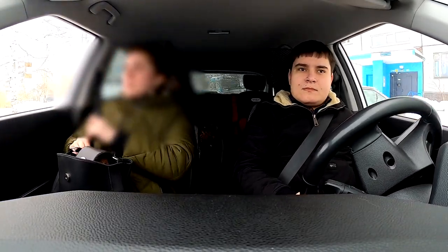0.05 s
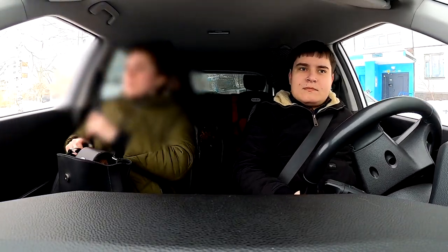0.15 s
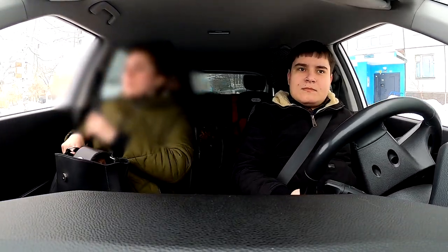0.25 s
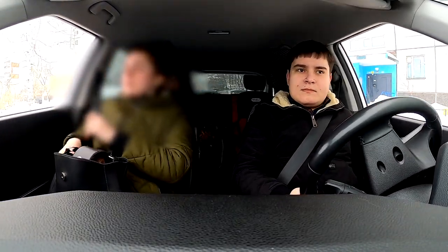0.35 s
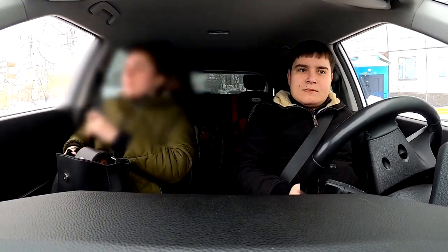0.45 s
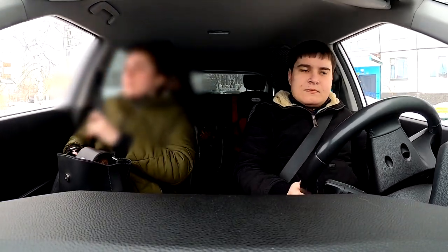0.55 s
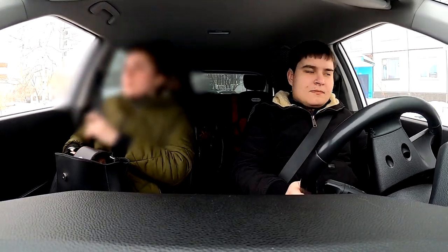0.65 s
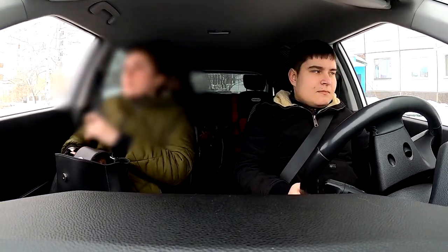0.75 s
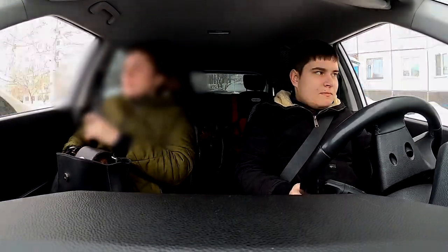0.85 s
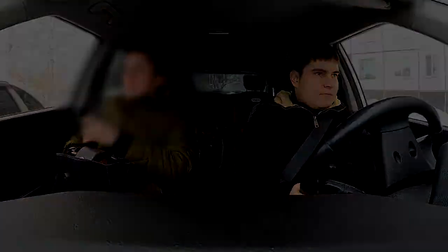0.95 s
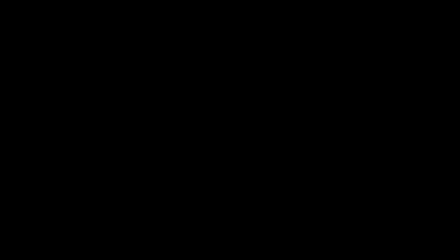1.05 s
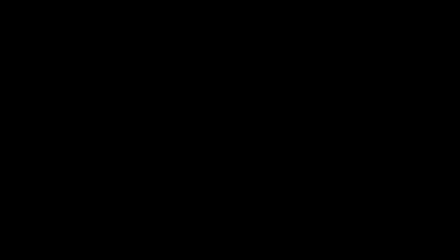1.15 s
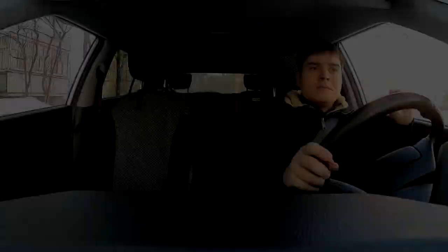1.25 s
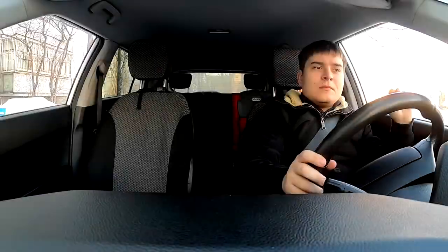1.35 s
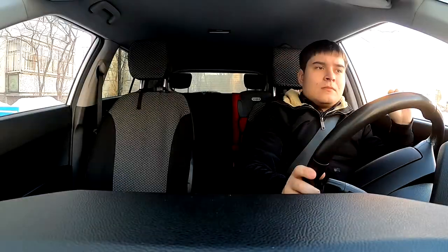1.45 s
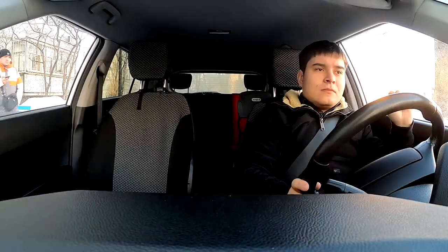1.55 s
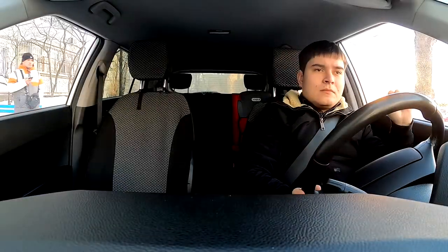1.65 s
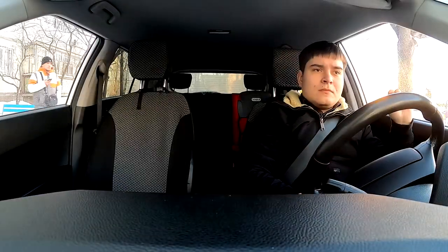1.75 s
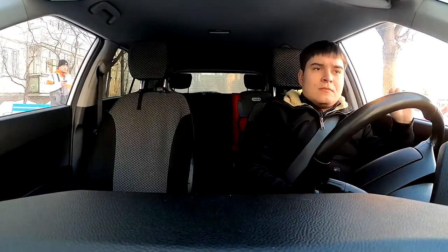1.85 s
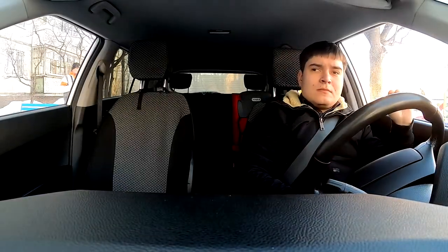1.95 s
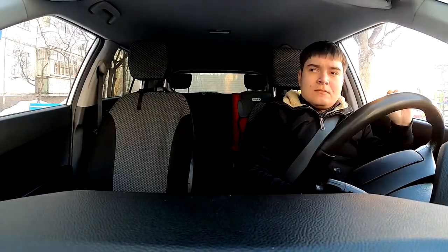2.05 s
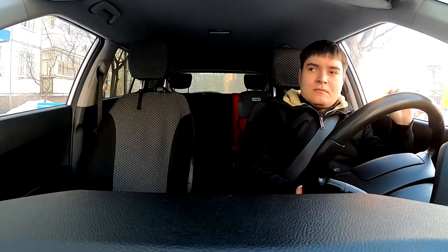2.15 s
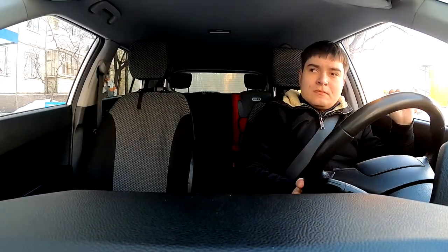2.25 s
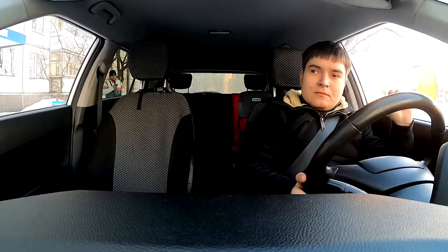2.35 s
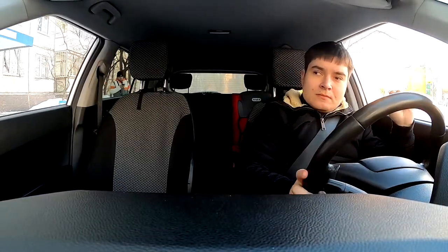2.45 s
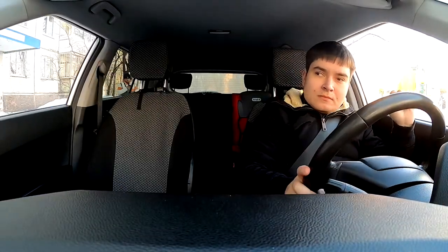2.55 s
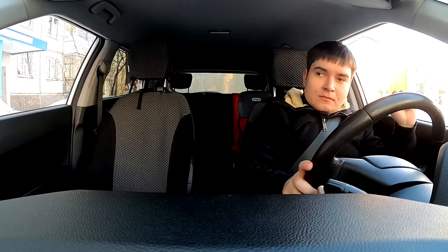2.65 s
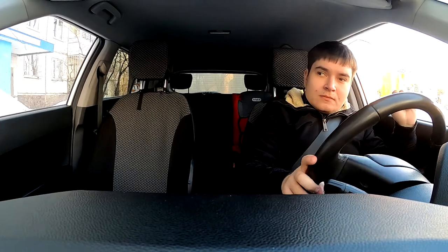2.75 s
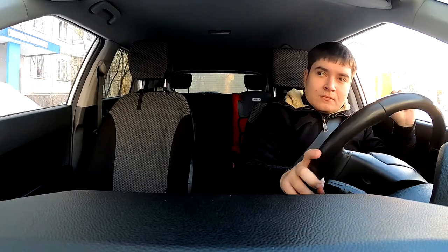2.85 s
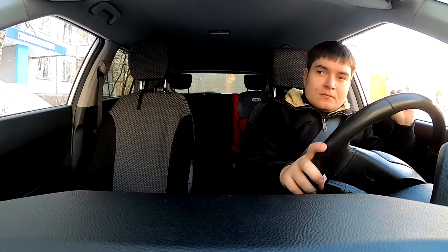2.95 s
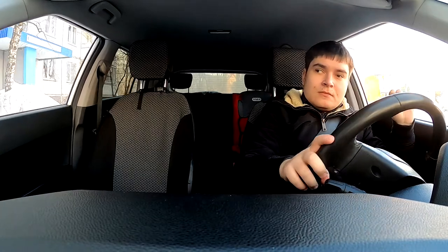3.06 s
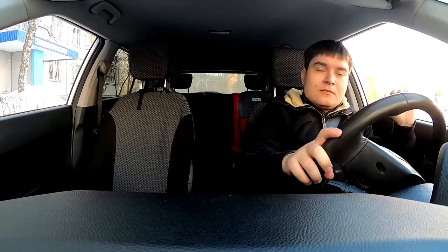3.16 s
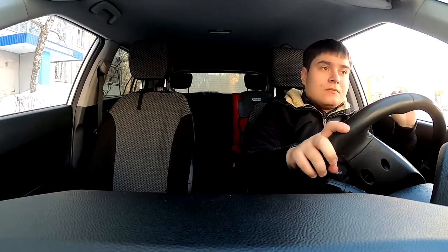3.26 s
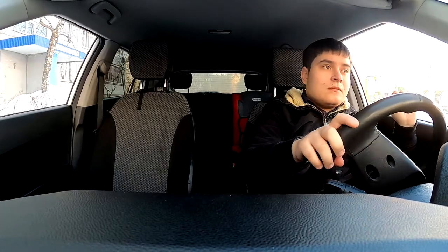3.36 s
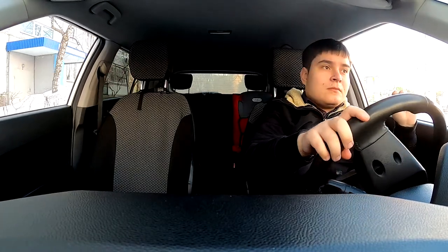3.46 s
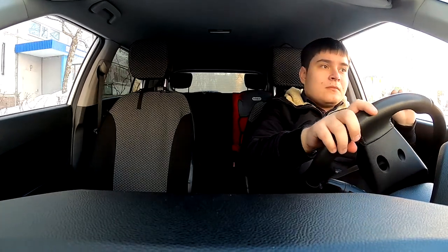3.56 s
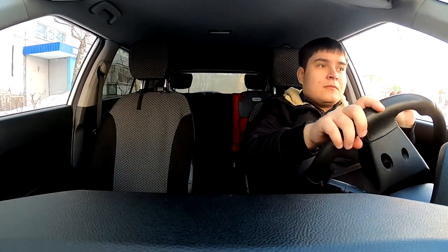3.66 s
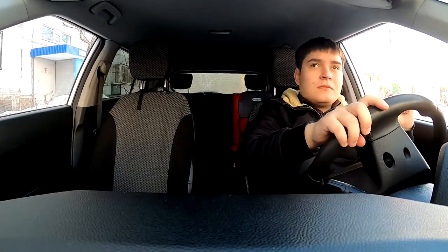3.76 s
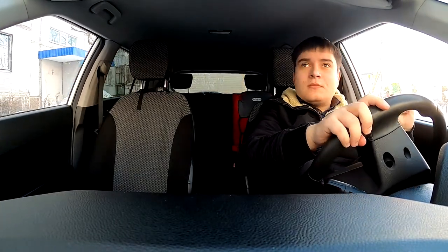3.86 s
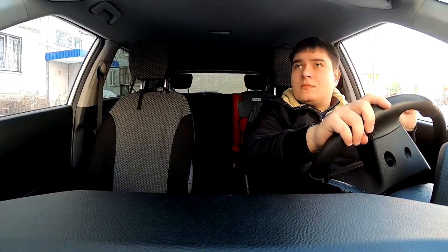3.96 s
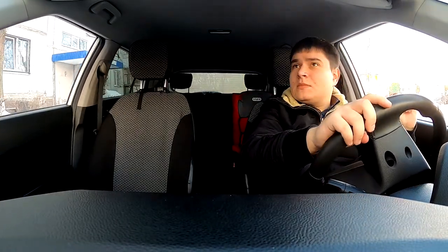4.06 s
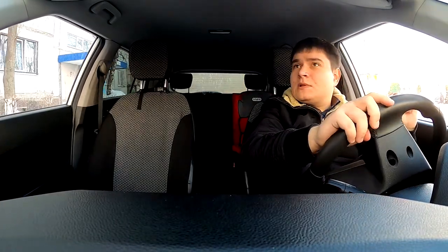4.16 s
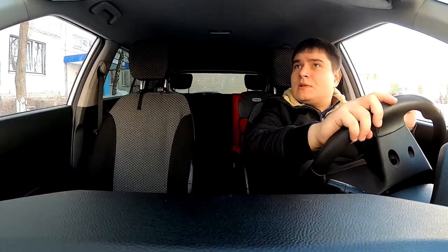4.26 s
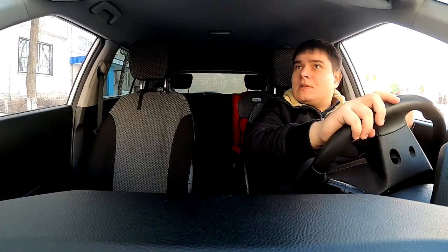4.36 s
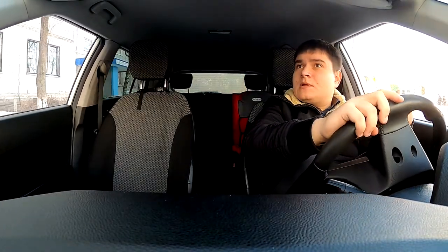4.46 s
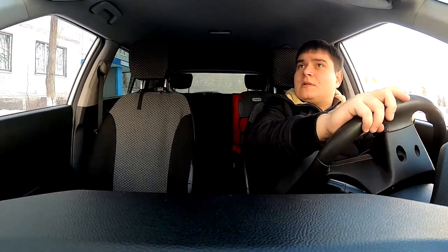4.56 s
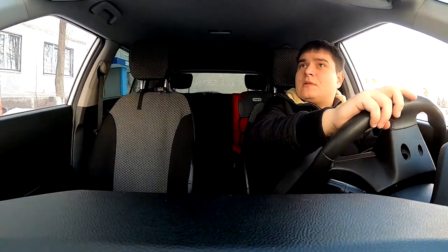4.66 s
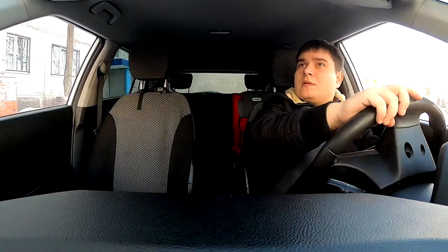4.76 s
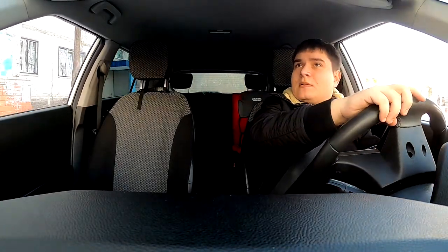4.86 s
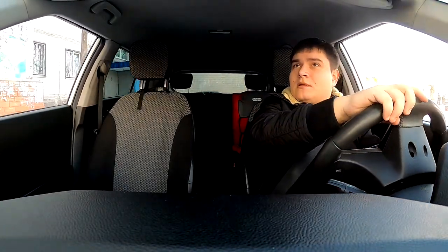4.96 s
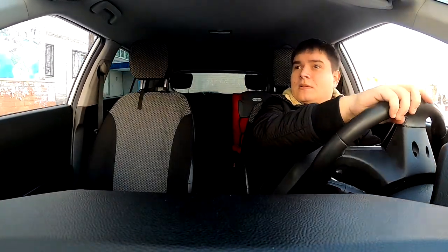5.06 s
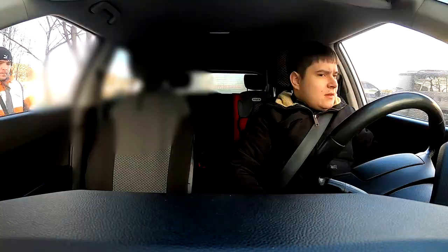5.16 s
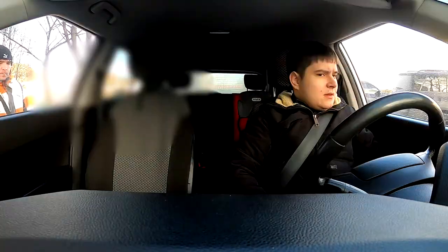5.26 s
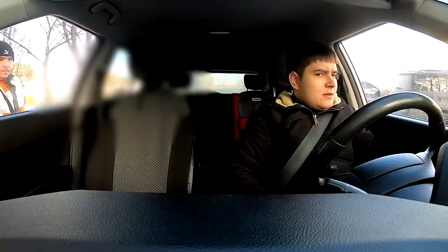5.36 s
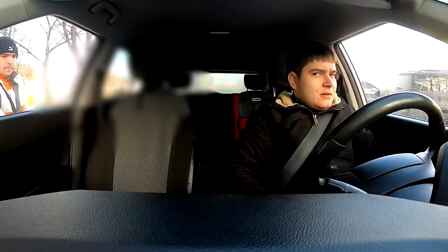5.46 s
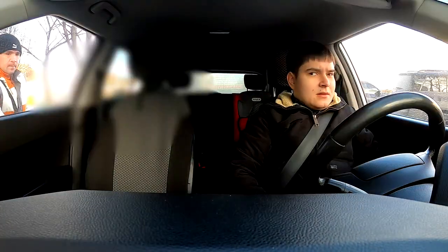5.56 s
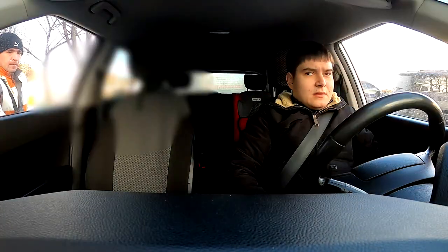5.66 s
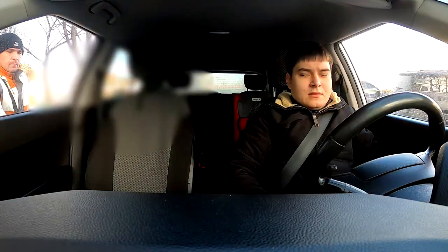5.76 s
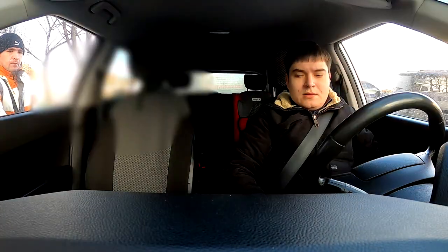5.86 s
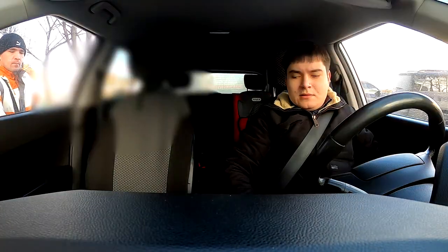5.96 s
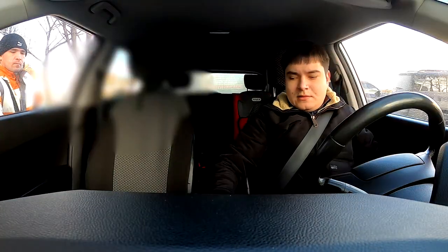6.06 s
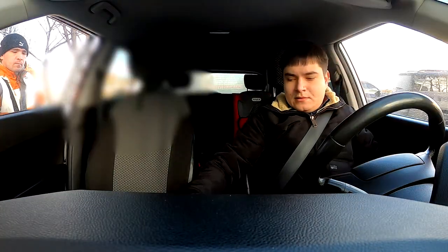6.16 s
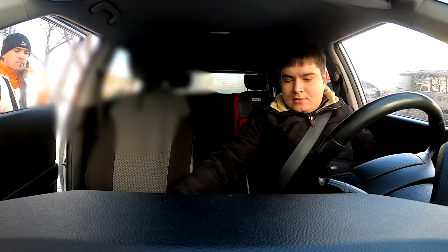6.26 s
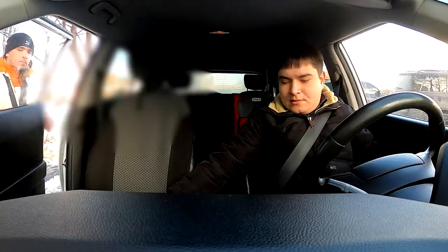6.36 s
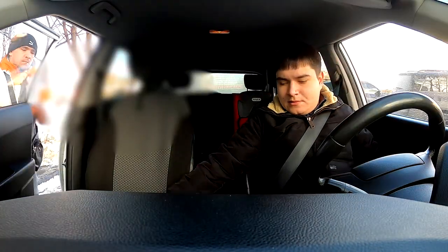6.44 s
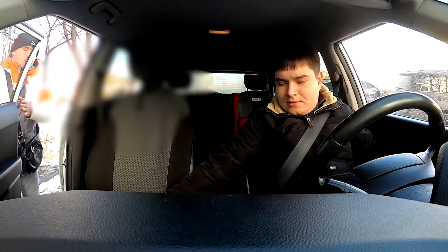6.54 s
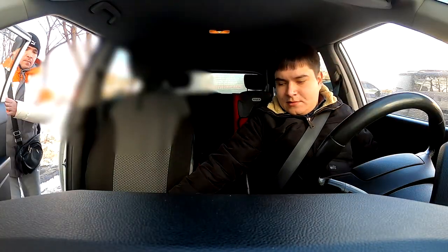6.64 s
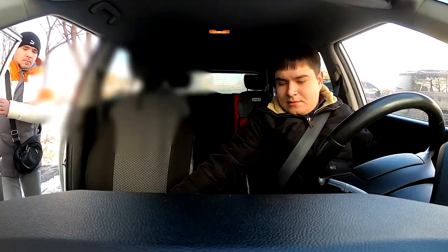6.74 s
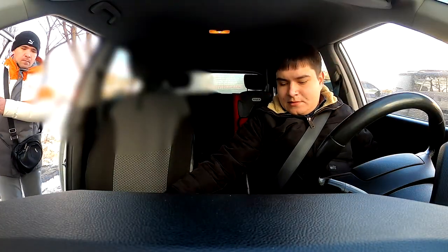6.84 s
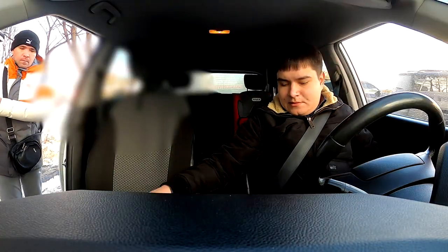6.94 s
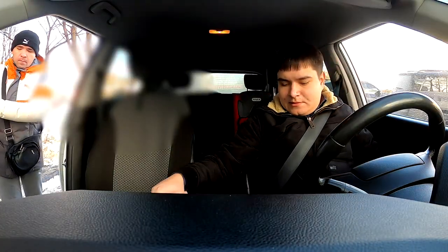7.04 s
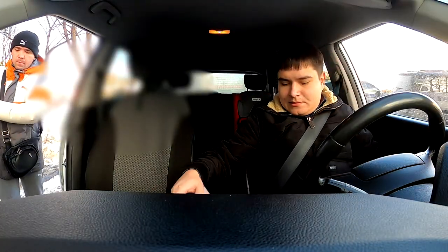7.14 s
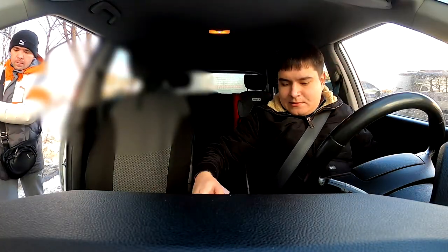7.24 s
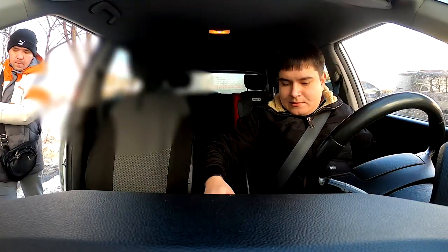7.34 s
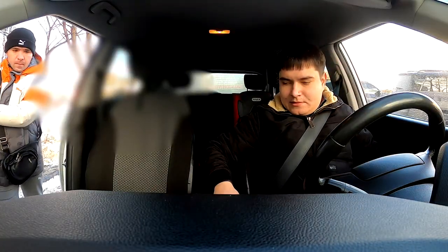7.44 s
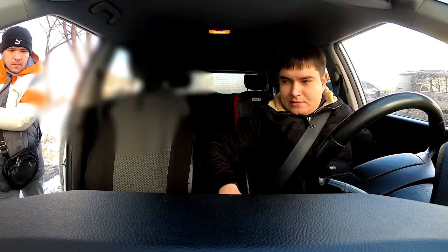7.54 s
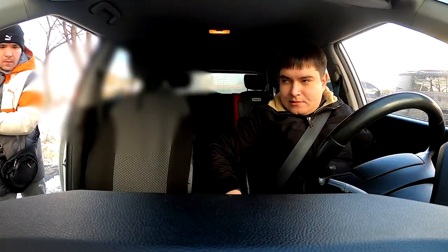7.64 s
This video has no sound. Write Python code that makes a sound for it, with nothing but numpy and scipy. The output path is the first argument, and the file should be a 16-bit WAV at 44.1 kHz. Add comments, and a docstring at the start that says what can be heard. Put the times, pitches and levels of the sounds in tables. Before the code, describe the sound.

Low, boomy car cabin rumble dips out once, cuts abruptly to a quiet idle, then a door unlatches, thuds open and a hand scuffs plastic.

```python
"""A low body boom and tyre drone fill a car crawling over a rough road, with faint gear tones and a blower:
narrow modes swing at wandering levels, and coloured noise makes the broad layers. Sleeves rustle as gated noise,
hands and trim tick as grainy bursts; all but the ticks fades out and in once. At a hard splice the car stands
at idle, a sum of engine orders. A door is unlatched, pops open and thuds on its stop as struck modes ring,
street air comes in through the gap, and a hand scuffs the hollow console in filtered grains."""
import sys
import numpy as np
from scipy import signal
from scipy.fft import rfft, irfft
from scipy.io import wavfile
from scipy.ndimage import uniform_filter1d

SR = 44100
rng = np.random.default_rng(int(sys.argv[2]) if len(sys.argv) > 2 else 0)


def waveform_to_disk(signal):
    """Save audio, clipped to [-1, 1], as 16-bit WAV at the path in sys.argv[1]."""
    frames = np.transpose(np.atleast_2d(signal))
    scaled = np.clip(frames, -1, 1) * 32767
    samples = np.round(scaled).astype(np.int16)
    wavfile.write(sys.argv[1], SR, samples)


def decibels_to_gain(level_db):
    """Convert a level in decibels to a linear amplitude gain (20 dB per decade)."""
    exponent = np.asarray(level_db, float) / 20
    return 10 ** exponent


N = 339570
T = np.arange(N) / SR

# slow swells of the low boom: (t/s, 31 Hz level/dB, 49 Hz level/dB)
BOOM_SWELLS = [(0, -18.5, -23), (.26, -26, -20), (.39, -17, -26), (.52, -19, -25), (.72, -20, -21),
               (.91, -24, -23), (1.43, -23, -18), (1.7, -22.5, -26), (2.03, -18, -22.5), (2.21, -25, -20.5),
               (2.34, -17.5, -27), (2.47, -24, -27), (2.6, -14.5, -27), (2.84, -27.5, -27.5),
               (2.99, -15.5, -24), (3.25, -30.5, -34), (3.51, -17, -21.5), (3.64, -17, -25.5),
               (3.8, -29.5, -25), (4.03, -18.5, -33.5), (4.29, -19.5, -27), (4.42, -30.5, -26.5),
               (4.8, -17, -26.5), (4.95, -21, -28.5), (5.15, -30.5, -25.5)]
# door blows: (t/s, panel level/dB, panel tilt/(dB per octave), latch level/dB,
# latch tilt/(dB per octave), rattle length/s)
DOOR_BLOWS = [(5.917, -22, 5.5, -25, 1.5, 0.03), (6.073, -18, -1, -34, 5, 0.02832),
              (6.085, -17.5, 10, -19.5, -6, 0.025), (6.583, -17.5, 0, -15.5, -7, 0.012),
              (6.588, -13, -4, -22.5, 5, 0.025), (6.6, -19.5, 2, -26.5, -4.5, 0.03225),
              (6.64, -26, -4, -36.5, -9.5, 0.062), (7.653, -32.5, 7, -46, -2.5, 0.012)]
# bending modes of the door panel: (f/Hz, level/dB, t60/s)
PANEL_MODES = [(61.21, -19, 0.18), (84.31, -11, 0.2506), (119, -6, 0.3421), (152, 0, 0.1479),
               (205, -4, 0.119), (262, -13, 0.22), (352, -3, 0.11983), (407, -11, 0.083),
               (553, -26.5, 0.099), (776.45, -46, 0.11), (1030, -39.5, 0.076), (1260, -45.5, 0.1168)]


def unit(x):
    """Normalisation of signal power: scale to rms 1."""
    return x / np.sqrt(np.mean(x ** 2))


def colour(x, points):
    """Linear filtering by a spectrum of (f/Hz, level/dB) points, falling steeply beyond its ends."""
    hz, db = np.transpose(points)
    f = np.maximum(np.fft.rfftfreq(x.shape[-1], 1 / SR), 1)
    octaves_out = np.abs(np.log2(f / np.clip(f, hz[0], hz[-1])))
    gain_db = np.interp(np.log(f), np.log(hz), db) - 24 * octaves_out
    return irfft(rfft(x) * decibels_to_gain(gain_db), x.shape[-1])


def walk(rate):
    """Low-pass random process: levels held 1 / rate s and averaged twice, rms 1."""
    k = int(SR / rate)
    held = np.repeat(rng.standard_normal(N // k + 1), k)
    return unit(uniform_filter1d(uniform_filter1d(held, k), k)[:N])


def spread(mid, side, share):
    """Mid-side superposition: the side share enters the two ports in opposite phase."""
    return mid + share * side * np.array([[1], [-1]])


def pan(db):
    """Interaural level difference: left and right gains that differ by db."""
    return decibels_to_gain(np.array([[db], [-db]]) / 2)


def bed(points, side_db, pan_db, flicker_db, rate):
    """Partly coherent stereo noise: coloured, flickering, with an unrelated side share."""
    mid, side = colour(rng.standard_normal((2, N)), points)
    both = spread(unit(mid), unit(side), decibels_to_gain(side_db))
    return both * unit(decibels_to_gain(flicker_db * walk(rate))) * pan(pan_db)


def columns(table):
    """Linear interpolation of each column of a curve table at every sample."""
    s, *rest = np.transpose(table)
    return [np.interp(T, s, c) for c in rest]


def ring(modes, push, tilt_db=0., length=.5):
    """Modal superposition: decaying modes convolved with a push; peak 1."""
    t = np.arange(int(length * SR)) / SR
    body = 0
    for hz, db, t60 in modes:
        gain = decibels_to_gain(db + tilt_db * np.log2(hz / modes[0][0]))
        body = body + gain * np.sin(2 * np.pi * hz * t) * np.exp(-np.log(1000) * t / t60)
    out = signal.fftconvolve(body, push)
    return out / np.abs(out).max()


def favour(modes, centre_hz, fall_db):
    """Selective modal excitation: modes far from the favoured pitch are driven less."""
    return [(hz, db - fall_db * np.log2(hz / centre_hz) ** 2, t60) for hz, db, t60 in modes]


def add(out, s, sound):
    """Superposition of a short sound at a given time."""
    i = int(s * SR)
    out[:, i:i + sound.shape[-1]] += sound[..., :N - i]


def rolling():
    """Superposition of all rolling sources under one fade, with an interaural delay."""
    # gain of the rolling sound: (t/s, gain)
    fade = [(.84, 0.9961), (1.135, 0.01009), (1.42, 0.8374)]
    lower_db, upper_db = columns(BOOM_SWELLS)
    out = rumble() + body_modes(lower_db, upper_db) + tyre_drone(lower_db) + blower()
    out = (out + cloth() + hiss() + whine() + bumps()) * columns(fade)[0]
    # the sound reaches the left port two samples late
    return np.array([np.pad(out[0], (2, 0), "edge")[:N], out[1]])


def rumble():
    """Broadband structure-borne noise: a swaying boom that eases as the car slows."""
    # boom spectrum: (f/Hz, level/dB per Hz)
    boom = [(6, -21), (12, -10), (25, 17.5), (45, -6), (70, 0), (90, 5), (110, -25)]
    start_db, settle_db_per_s, sway_db = -27.5, -.5, 1.5561
    level_db = start_db + settle_db_per_s * T + sway_db * walk(2.6)
    return decibels_to_gain(level_db) * bed(boom, -13.5, 0.89, 0.79, 10)


def body_modes(lower_db, upper_db):
    """Narrow-band vibration: four low modes of the body wander in pitch and swell in level."""
    # body modes: (f/Hz, level over swell/dB, slow drift as a share of f, slow swing/dB)
    modes = [(21.177, -31, 0.04868, 3), (31.234, 1, 0.02075, 0.5), (48.528, 0, 0.022614, 0.5),
             (64.946, -33.5, 0.039357, 2)]
    per_upper, upper_mean_db = .4, -27.5
    # the outermost modes follow the upper swell a little
    follow_db = per_upper * (upper_db - upper_mean_db)
    out = np.zeros((2, N))
    for (centre_hz, db, drift, swing_db), swell_db in zip(modes, (follow_db, lower_db, upper_db, follow_db)):
        hz = centre_hz * (1 + drift * walk(3) + 0.0541 * walk(14))
        phase = 2 * np.pi * np.cumsum(hz) / SR + rng.uniform(0, 2 * np.pi)
        # higher modes flicker more
        level_db = db + swell_db + swing_db * walk(6) + 0.05037 * centre_hz * walk(18)
        out = out + np.sqrt(2) * decibels_to_gain(level_db) * np.sin(phase) * pan(0.78)
    return out


def tyre_drone(lower_db):
    """Tyre noise as band-limited noise whose level follows the lower swell of the boom a little."""
    # drone spectrum: (f/Hz, level/dB per Hz)
    drone = [(70, -21.5), (90, 1), (130, -1.5), (155, -9), (195, -6), (235, -16), (330, -20), (420, -31.5),
             (600, -73.5)]
    mean_db, sway_db = -34, 1.5561
    per_lower, lower_mean_db = 0.22, -23.5
    level_db = mean_db + per_lower * (lower_db - lower_mean_db) + sway_db * walk(4.0274)
    return decibels_to_gain(level_db) * bed(drone, -22.5, 1.7, 0.9086, 12)


def blower():
    """Turbulent flow noise, weaker from one moment on."""
    # blower spectrum: (f/Hz, level/dB per Hz)
    flow = [(250, -3.5), (480, -4), (600, -10.5), (680, -15.5), (930, -16.5), (1200, -23), (2500, -31),
            (5000, -41), (8300, -36.5), (9500, -60)]
    before_db, after_db, step_s = -52, -56.5, 1.2
    return decibels_to_gain(np.where(T < step_s, before_db, after_db)) * bed(flow, -7.5, 2.0, 0.93, 13)


def cloth():
    """Friction noise of sleeves and hands: each movement swells, holds and stops, over a faint rest."""
    # movements: (start t/s, length/s, low rustle level/dB, high rustle level/dB)
    movements = [(0, 0.285, -66.5, -65), (0.288, 0.2696, -66, -67), (0.608, 0.39, -83.5, -72),
                 (1.364, 0.16, -79.5, -68), (1.495, 0.26, -64.5, -63.5), (1.77, .25, -66, -64),
                 (1.887, 0.14786, -61.5, -66), (2.137, 0.1431, -72.5, -73), (2.56, 0.096, -64, -66),
                 (2.967, 0.15, -68, -74.5), (3.187, 0.23, -89, -76), (3.538, .1, -66, -70),
                 (3.741, 0.093, -70.5, -69.5), (4.188, 0.13543, -69, -75), (4.332, .5, -73.5, -72.5),
                 (4.842, 0.1716, -67.5, -68)]
    # low and high rustle spectra: (f/Hz, level/dB per Hz)
    low_points, high_points = [(800, -13.5), (1150, -12.5), (1550, -7.5), (1900, -15), (2200, -18.5),
                               (3000, -46.5)], [(1900, -15), (2300, -10), (2700, -4), (3200, -10.5), (3800, -4),
                                            (4400, -8.5), (5200, -9.5), (6200, -17), (8300, -16),
                                            (9500, -24.5)]
    attack_s, release_s = 0.019, 0.048
    gains = decibels_to_gain([[-72], [-77.5]]) * np.ones(N)  # low and high rustle at rest
    for s, length, low_db, high_db in movements:
        swell, stop = (T - s) / attack_s + .5, (s + length - T) / release_s + .5
        gains = gains + decibels_to_gain([[low_db], [high_db]]) * np.clip(np.minimum(swell, stop), 0, 1)
    low, high = gains
    return low * bed(low_points, -6.0, 0.9994, 1.6, 90) + high * bed(high_points, -3, 1.5, 1.3, 120)


def hiss():
    """Microphone self-noise: faint, steady and broadband."""
    # hiss spectrum: (f/Hz, level/dB per Hz)
    noise = [(300, 2.5), (8000, -8), (10000, -17), (15000, -28.5)]
    return decibels_to_gain(-76) * bed(noise, 0, 1.5, .3, 9.3)


def whine():
    """Gear-mesh tones: two sinusoids wavering in level and pitch as the car picks up speed."""
    # gear tones: (t/s, low f/Hz, low level/dB, high f/Hz, high level/dB)
    gear_tones = [(0, 185.5, -50.5, 750, -71.5), (.15, 195.4, -45.5, 748.9, -63),
                  (.3, 205, -42.5, 791.3, -63.5), (.42, 208.2, -45, 783.4, -66.5),
                  (.52, 210.5, -45.5, 732.7, -64.5), (.65, 210.7, -63, 735.5, -87),
                  (.9, 211, -91, 790, -100)]
    low_hz, low_db, high_hz, high_db = columns(gear_tones)
    out = 0
    for hz, db in ((low_hz, low_db), (high_hz, high_db)):
        level = np.sqrt(2) * decibels_to_gain(db + 3.809 * walk(25))
        phase = 2 * np.pi * np.cumsum(hz * (1 + .014 * walk(30))) / SR
        out = out + level * np.sin(phase)
    return out * pan(2.2)


def hands():
    """Low-pass filtering: ticks and console scuffs, softened above 9 kHz."""
    return signal.sosfilt(signal.butter(4, 9000, fs=SR, output="sos"), ticks() + scuffs())


def ticks():
    """Stick-slip of hands and trim: each tick is a snap amid a grainy cluster of small slips."""
    # ticks: (t/s, level/dB, left minus right level/dB, brightness/(dB per octave))
    tick_events = [(0.0743, -46.5, 9, 7.5), (0.3536, -34.5, 3, 3.5), (0.4704, -50.5, 5, 14),
                   (0.7146, -49, -0.5, 10), (1.337, -47.5, 1, 4.5), (1.382, -43, -1.5, 4.5),
                   (1.394, -42, -0.5, 5.5), (1.4174, -52.5, 8, 3), (2.584, -42, -1, -8.5),
                   (2.639, -42.5, -4.5, -2), (3.186, -50.5, 4.5, -3), (3.294, -54.5, -1, 6),
                   (3.3358, -41.5, -1, 1.5), (3.579, -49, -9, -2), (3.8896, -64.5, 5, -13),
                   (4.1976, -60, -8, 4), (4.2719, -38.5, -2, 6), (4.8868, -41, -2, 1),
                   (5.1253, -44.5, 4, -10.5), (6.4647, -37.5, 0.5, -7), (6.917, -37, 6.5, -3.5)]
    # tick spectrum: (f/Hz, level/dB)
    tick_points = [(900, -5), (1600, -1), (2600, -7), (3600, -3), (4500, -3), (5500, -8.5), (6300, -19),
                   (8300, -21.5), (10000, -42.5)]
    snap_t60_s, crackle_t60_s, creep_t60_s = .022, 0.15, 0.2
    crackle_db, creep_db, slip_db = -7, -16, 2.5
    out, t = np.zeros((2, N)), np.arange(-1300, 2700) / SR

    def fall(t60):
        """Exponential decay away from the snap on either side."""
        return np.exp(-np.log(1000) * np.abs(t) / t60)

    # creep leads up to the snap, crackle trails it
    cluster = np.where(t > 0, decibels_to_gain(crackle_db) * fall(crackle_t60_s), decibels_to_gain(creep_db) * fall(creep_t60_s))
    shape = (t > 0) * fall(snap_t60_s) + cluster
    for s, db, pan_db, tilt_db in tick_events:
        points = [(hz, tick_db + tilt_db * np.log2(hz / 4000)) for hz, tick_db in tick_points]
        slips = decibels_to_gain(slip_db * np.repeat(rng.standard_normal(40), 100))
        mid, side = colour(rng.standard_normal((2, len(t))), points) * shape * slips
        add(out, s + t[0], decibels_to_gain(db) * spread(mid, side, .5) / np.abs(mid).max() * pan(pan_db))
    return out


def bumps():
    """Impulse response of the suspension: each road bump rings two damped modes."""
    # bumps: (t/s, level/dB, f/Hz)
    road_bumps = [(1.869, -27, 133), (2.017, -48, 102.4), (2.588, -14, 150), (2.834, -18, 138),
                  (2.918, -20.5, 189), (2.979, -20.5, 213), (3.551, -24.5, 105.4), (4.634, -43, 97),
                  (4.783, -32, 146), (5.121, -35, 191)]
    out = np.zeros((2, N))
    for s, db, hz in road_bumps:
        modes = [(hz, 0, .09), (1.595 * hz, -8, .05)]
        add(out, s, decibels_to_gain(db) * ring(modes, np.hanning(160)) * pan(1.2))
    return out


def idling():
    """Superposition of engine, trim and outside air, coupled by shared level curves."""
    # the engine slows a little and ends louder, the door open: (t/s, firing f/Hz, level/dB)
    firing = [(5.16, 22.14, -30.5), (5.9, 22.09, -31.5), (6.5, 21.93, -34.5), (6.8, 21.86, -28),
              (7.7, 21.99, -26)]
    # outside air through the door gap: (t/s, level/dB)
    gap = [(5.16, -80.5), (5.8, -72), (5.92, -58), (6.03, -48), (6.1, -50.5), (6.19, -56), (6.28, -55.5),
           (6.5, -58.5), (6.68, -55), (6.8, -62), (7, -56), (7.25, -53.5), (7.7, -47)]
    firing_hz, firing_db = columns(firing)
    turn = 2 * np.pi * np.cumsum(firing_hz) / SR
    air_db = columns(gap)[0]
    return decibels_to_gain(firing_db) * engine(turn) + trim_shake(turn, firing_db) + street(air_db) + outside_air(air_db)


def engine(turn):
    """Harmonic synthesis: firing and half orders of a four-cylinder, with cyclic variation."""
    # engine orders: (multiple of the firing rate, level/dB)
    orders = [(1, 2.5), (1.5, -27), (2, -10.5), (2.5, -17), (3, -25), (3.5, -37), (4, -24.5), (4.5, -26.5),
              (5, -39.5)]
    out = 0
    for k, db in orders:
        # higher orders waver more from cycle to cycle
        level = np.sqrt(2) * decibels_to_gain(db + 1.0 * np.sqrt(k) * walk(7.0))
        out = out + level * np.sin(k * (turn + 0.079 * walk(17.0)) + rng.uniform(0, 2 * np.pi))
    return out * pan(0.74)


def trim_shake(turn, firing_db):
    """Amplitude-modulated noise: trim throbs at the firing rate and shudders after door blows."""
    # trim spectrum: (f/Hz, level/dB per Hz)
    trim = [(25, 5), (50, 4), (100, 6), (150, 1), (200, 7.5), (260, -1.5), (350, -5), (450, -18.5),
            (650, -69)]
    mean_db, per_firing, firing_mean_db = -38, 0.45, -28.5
    shudder_db, shudder_t60_s = -18, 0.2044  # level relative to each blow on the panel
    level = decibels_to_gain(mean_db + per_firing * (firing_db - firing_mean_db) + 0.72 * walk(5))
    for s, panel_db, *_ in DOOR_BLOWS:
        level = level + decibels_to_gain(panel_db + shudder_db - 60 * np.abs(T - s) / shudder_t60_s) * (T > s)
    throb = 1 + 0.19 * np.sin(turn)
    return level * throb * bed(trim, -20.5, 1.7, 1.0, 14)


def street(air_db):
    """Partial transmission: street rumble follows the outside air only weakly."""
    # street spectrum: (f/Hz, level/dB per Hz)
    traffic = [(250, -5.5), (480, 5.5), (700, -5), (950, -5.5), (1400, -16.5), (2000, -22), (4000, -40.5),
               (8300, -46.5), (9500, -45)]
    full_db, per_air, air_full_db = -52.5, 0.17888, -50
    level_db = full_db + per_air * (air_db - air_full_db)
    return decibels_to_gain(level_db) * bed(traffic, -7.5, 3.8, 1.3, 18)


def outside_air(air_db):
    """Aperture transmission: broadband street air enters through the door gap."""
    # outside air spectrum: (f/Hz, level/dB per Hz)
    open_air = [(900, -6), (1450, 0), (2200, -6.5), (3700, -8), (5500, -12.5), (8300, -17.5), (9500, -26),
                (12500, -33), (15000, -56)]
    return decibels_to_gain(air_db) * bed(open_air, -2, 2.9, 0.63, 30)


def door():
    """Low-pass filtering: blows, knocks and seal sound together, dull above 8.8 kHz."""
    out = door_blows() + knocks() + seal()
    return signal.sosfilt(signal.butter(8, 8800, fs=SR, output="sos"), out)


def door_blows():
    """Modal excitation by impact: each blow is a short rattle that rings panel and latch."""
    out, latch = np.zeros((2, N)), latch_modes()
    # high-pass at 55 Hz keeps slow offset out of the panel ring
    high_pass = signal.butter(2, 55, "high", fs=SR, output="sos")
    for s, panel_db, panel_tilt_db, latch_db, latch_tilt_db, rattle_s in DOOR_BLOWS:
        u = np.linspace(0, 1, int(rattle_s * SR))
        fall = np.minimum(u / 0.07654, 1) * np.exp(-2.2 * u)
        panel = ring(PANEL_MODES, fall * rng.standard_normal(len(u)), panel_tilt_db)
        panel = signal.sosfilt(high_pass, panel)
        add(out, s, decibels_to_gain(panel_db) * panel / np.abs(panel).max() * pan(1.636))
        mid, side = (ring(latch, fall * rng.standard_normal(len(u)), latch_tilt_db, length=0.15)
                     for _ in range(2))
        add(out, s, decibels_to_gain(latch_db) * spread(mid, side, .5) * pan(5.425))
    return out


def latch_modes(count=70):
    """High modal density: many modes spread evenly in pitch, a little askew."""
    # latch plate spectrum: (f/Hz, level/dB)
    plate = [(520, -7), (720, -8), (1000, 1), (1250, 6.5), (1500, 5.5), (2000, 3.5), (2350, -1), (2900, -8),
             (3500, -8.5), (5000, -16.5), (8300, -61.5), (10000, -52)]
    # latch plate decay: (f/Hz, t60/s)
    decay = [(450, 0.3316), (1300, 0.07833), (3000, 0.04683), (10000, .03)]
    (hz, db), (at_hz, t60) = np.transpose(plate), np.transpose(decay)
    f = np.geomspace(hz[0], hz[-1], count) * (1 + 0.007026 * rng.standard_normal(count))
    level = np.interp(np.log(f), np.log(hz), db) + 10 * np.log10(f / hz[0])
    return list(zip(f, level, np.interp(np.log(f), np.log(at_hz), t60)))


def knocks():
    """Position-dependent excitation: single hard knocks favour the panel modes near one pitch."""
    # knocks within the blows: (t/s, level/dB, favoured f/Hz)
    hard_knocks = [(5.92, -31.5, 1260), (5.922, -22.5, 407), (5.932, -21, 352), (5.94, -26.5, 205),
                   (5.95, -26, 352), (6.08, -19.5, 407), (6.086, -22, 1030), (6.092, -13, 407),
                   (6.096, -17, 205), (6.106, -23.5, 262), (6.111, -18, 407), (6.587, -21.5, 1030),
                   (6.589, -13, 205), (6.5946, -13.5, 352), (6.599, -14.5, 152), (6.602, -29.5, 1260),
                   (6.6059, -12.5, 352), (6.611, -17, 205), (6.619, -14, 152), (6.631, -23, 352),
                   (6.647, -14.5, 119), (6.676, -17.5, 119), (7.656, -34, 553)]
    fall_db = 109.5  # one octave away from the favoured pitch
    out = np.zeros((2, N))
    flat = [(f, 0, t60) for f, _, t60 in PANEL_MODES]
    for s, db, hz in hard_knocks:
        push = np.hanning(int(SR / hz))
        add(out, s, decibels_to_gain(db) * ring(favour(flat, hz, fall_db), push) * pan(2.1))
    return out


def seal():
    """Cavity resonance: the parting seal pulls the cabin air, then sets its modes ringing."""
    # pops as the seal lets go: (t/s, level/dB, push length/s)
    pops = [(6.09, -9.5, 0.014234), (6.14, -6.5, 0.017)]
    # cabin air modes: (f/Hz, level/dB, t60/s)
    air_modes = [(12.1, 0, 0.45), (30.2, -22.5, 0.48), (49.3, 9.5, 0.26)]
    # one short pull of air as the lip parts: (t/s, level/dB, length/s)
    pulls = [(6.0725, -7.5, 0.006028)]
    out = np.zeros((2, N))
    for s, db, push_s in pops:
        add(out, s, -decibels_to_gain(db) * ring(air_modes, np.hanning(int(push_s * SR))) * pan(0.83))
    for s, db, length in pulls:
        add(out, s, -decibels_to_gain(db) * np.hanning(int(length * SR)) * pan(0.71))
    return out


def scuffs():
    """Friction-driven resonance: dense grains rubbed into the modes of the hollow console."""
    # scuffs: (start t/s, rub length/s, level/dB, favoured f/Hz, fall one octave away/dB)
    rubs = [(6.697, 0.03083, -45.5, 1300, 7.5), (6.727, 0.01392, -47, 1285, 51),
            (6.983, 0.01171, -50.5, 1402, 4.5), (6.993, 0.023285, -41, 1600, 1.5),
            (7.017, 0.02275, -35.5, 1900, 2.5), (7.04, 0.011247, -33.5, 1789, 8),
            (7.054, 0.026, -39, 1650, 6.5), (7.073, 0.02722, -41, 1279, 49), (7.19, 0.024, -58, 1487, 4.5),
            (7.265, 0.029, -50.5, 1271, 18.5), (7.494, 0.04805, -41, 1235, 61), (7.503, .025, -51, 3000, 4),
            (7.612, 0.07, -51, 2600, 13.5)]
    # console modes: (f/Hz, bandwidth/Hz, level/dB)
    console = [(330, 60, 3), (754.3, 120, 5), (1201.1, 130, -1.5), (1307.8, 112.8, 5.5),
               (1521.8, 207.3, 2.5), (1771.8, 167.4, 4.5), (2145.7, 380, -6.5), (2600, 154.7, -3.5),
               (3130, 510, -23.5), (3900, 410, -14.5)]
    out = np.zeros((2, N))
    modes = [(hz, mode_db + 10 * np.log10(width), 3 / width) for hz, width, mode_db in console]
    for s, length, db, centre_hz, fall_db in rubs:
        n = int(length * SR)
        grains = decibels_to_gain(2.5 * np.repeat(rng.standard_normal(60), 70)[:n])
        push = signal.windows.tukey(n, .2) * np.linspace(1, .5, n) * grains
        favoured = favour(modes, centre_hz, fall_db)
        mid, side = (unit(ring(favoured, push * rng.standard_normal(n), length=.03)) for _ in range(2))
        add(out, s, decibels_to_gain(db) * spread(mid, side, 0.383) * pan(2.1))
    return out


def scene():
    """Superposition across a splice: rolling gives way to idling as the waveform drops in one step."""
    splice_s, step_db = 5.1582, -24
    after = np.clip((T - splice_s) / 0.003 + .5, 0, 1)
    # the step rises from rest just before the splice and settles after it
    jump = decibels_to_gain(step_db) / 2 * np.sign(splice_s - T) * np.exp(-np.abs(T - splice_s) / 0.0072)
    return rolling() * (1 - after) + idling() * after + door() + hands() + jump


def roll_off(x):
    """The treble ends steeply here."""
    return signal.sosfilt(signal.butter(12, 15540, fs=SR, output="sos"), x)


def record(dry):
    """Two-channel transduction: the finished mix is passed on at its own level."""
    return roll_off(dry)


dry = scene()
out = record(dry)
waveform_to_disk(out)
```